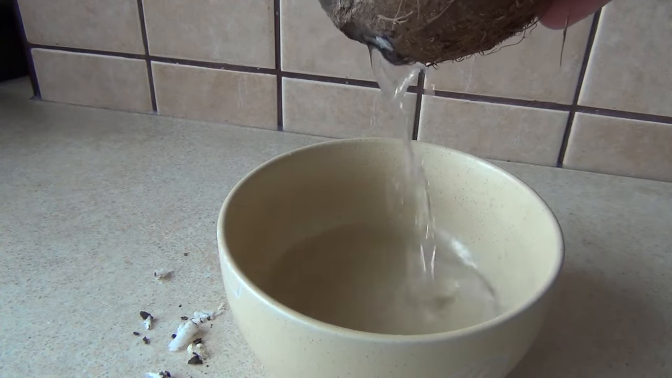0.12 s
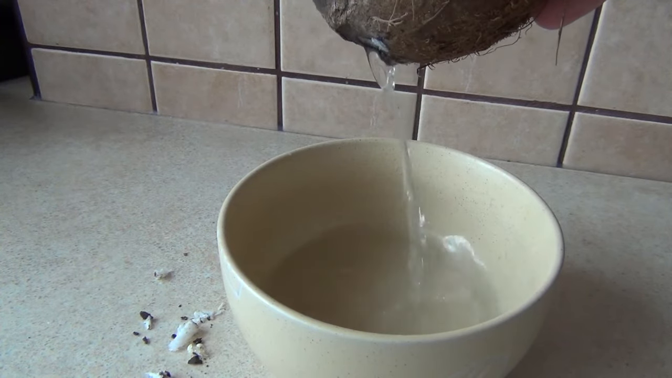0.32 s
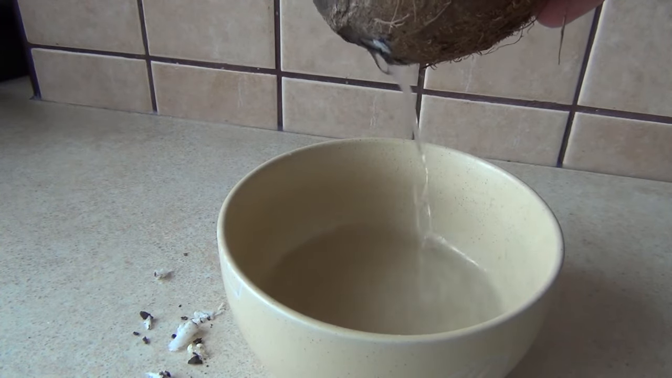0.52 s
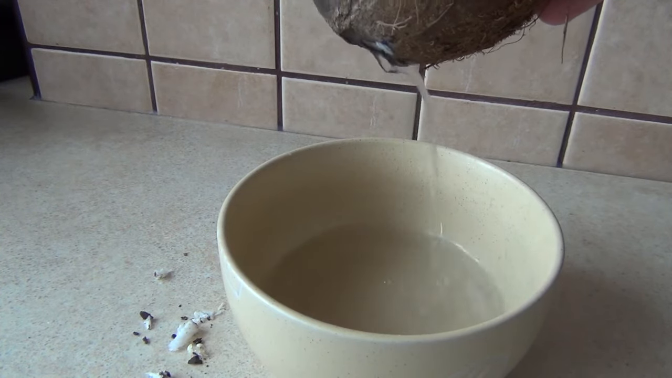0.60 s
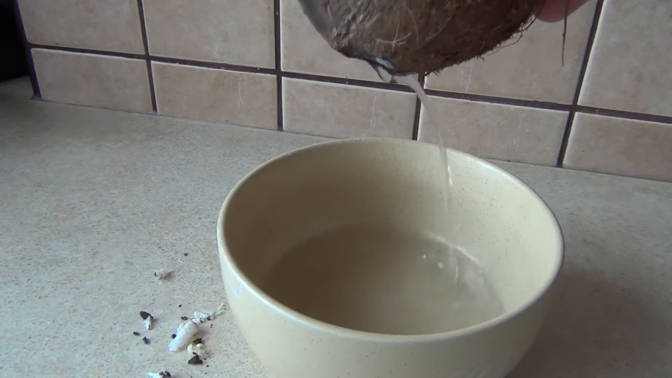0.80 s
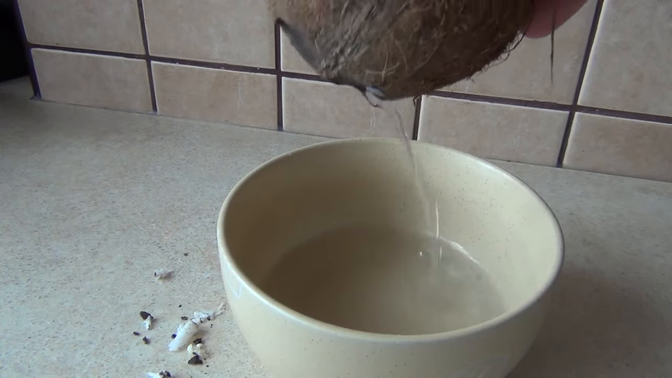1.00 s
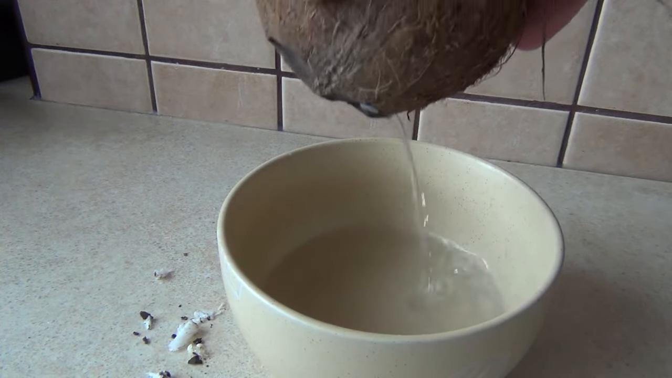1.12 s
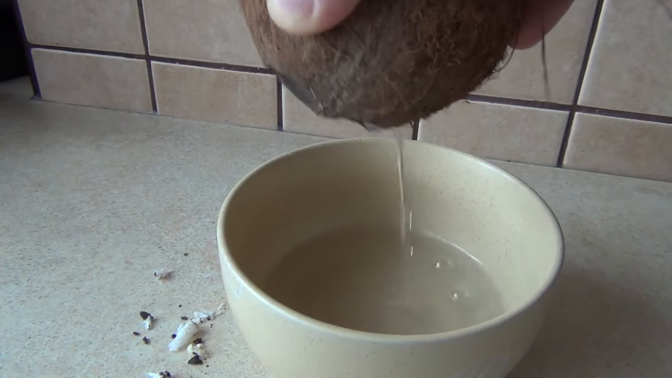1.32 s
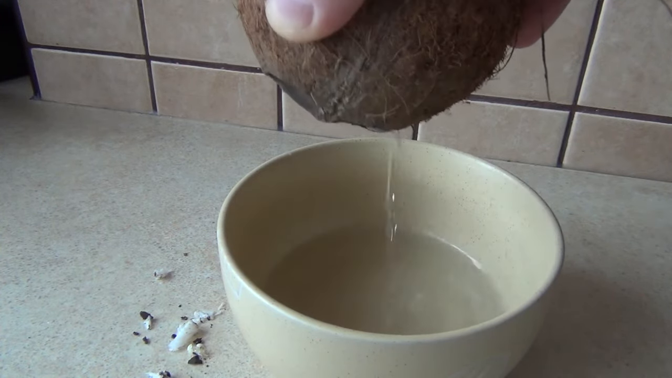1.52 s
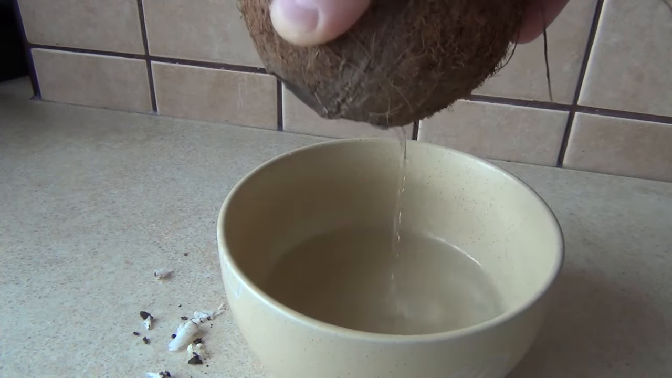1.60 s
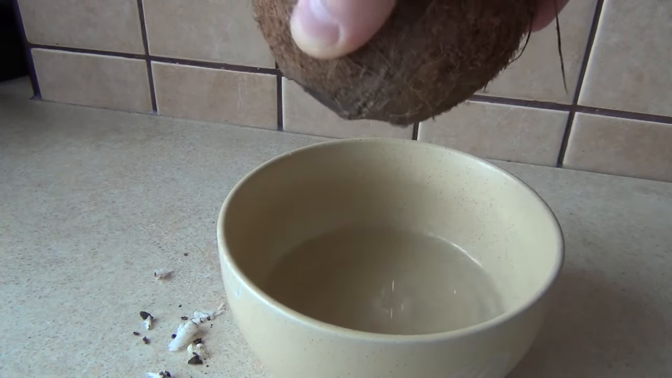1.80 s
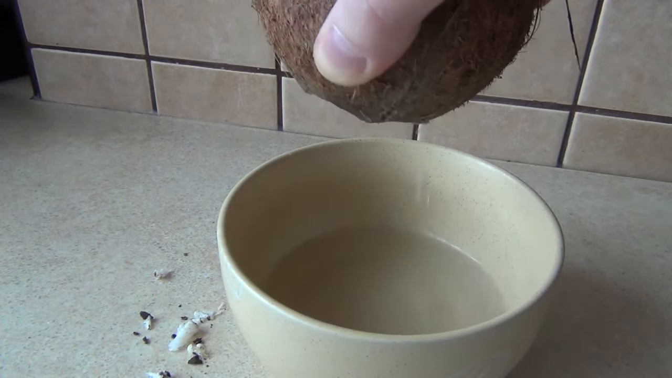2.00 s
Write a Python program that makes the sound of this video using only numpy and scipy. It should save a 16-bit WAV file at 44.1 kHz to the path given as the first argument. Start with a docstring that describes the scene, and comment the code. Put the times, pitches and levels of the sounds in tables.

```python
"""A kitchen counter, the camera's microphone close to a ceramic bowl. Appliances hum from the start.
A broken stream of water falls into the bowl: drops tick on the surface in a fine spray, then trap
bubbles that sing, most of them rising in pitch. The bowl rings along and the tiles echo.
After a second and a half the water thins to a few last drops, leaving the hum."""
import sys
import numpy as np
from scipy import signal
from scipy.fft import rfft, irfft, next_fast_len
from scipy.io import wavfile
from scipy.ndimage import uniform_filter1d

SR = 44100
rng = np.random.default_rng(int(sys.argv[2]) if len(sys.argv) > 2 else 0)


def master(y):
    """Save y as 16-bit WAV."""
    cut = np.clip(np.atleast_2d(y).T, -1, 1)
    pcm = np.round(cut * 32767)  # scale
    wavfile.write(sys.argv[1], SR, pcm.astype(np.int16))


N = 88200

# spectrum of appliance and camera noise (frequency [Hz], relative density [dB])
HUM_SPECTRUM = [(18, -66), (30, -20), (50, -10.5), (91, -14), (171, 0), (190, -7), (519, -13.5), (659, -5),
                (1060, -0.5), (1450, -22.5), (2740, -19), (4410, -19.5), (5160, -18.5), (9730, -28),
                (15200, -22.5), (16500, -78)]
# stereo width of that noise (frequency [Hz], side minus mid [dB])
HUM_WIDTH = [(60, -5), (110, -5), (200, -21), (380, -5.5), (700, -13), (1290, -21), (2380, -10.5),
             (4400, -30), (8120, -2), (15000, -45)]
# mains tones (frequency [Hz], level [dB], right minus left [dB])
MAINS_TONES = [(99.5, -75.5, 13.5), (199.3, -68.5, 10)]
# strength of the fine spray (time [s], level [dB])
SPRAY_LEVELS = [(.1, -70.5), (.3, -55.5), (0.398, -54), (.7, -46.5), (0.849, -57), (1.001, -41),
                (1.05, -53.5), (1.5, -57.5), (1.56, -64)]
# drops meeting the surface (time [s], level [dB], pitch [Hz], decay to 1/e [cycles])
DROP_TICKS = [(0.0307, -43, 10600, 5), (0.137, -31, 8740, 2.2), (0.1555, -18, 12240, 4.9),
              (0.1698, -30.5, 10230, 10.4), (0.202, -40, 8250, 4.1), (0.2211, -23, 10040, 4.7),
              (0.2599, -19, 11300, 11.3), (0.279, -25, 9400, 5.9), (0.293, -17, 10850, 2.5),
              (0.3235, -27, 13400, 3.5), (0.33, -12, 8900, 2.7), (0.3386, -8, 10600, 4.5),
              (0.3692, -4, 10180, 2.1), (0.3934, -34, 9150, 4.5), (0.4197, -23, 8960, 3.7),
              (0.4453, -11.5, 9250, 2.3), (0.4533, -15, 10460, 2), (0.457, -13, 10600, 4.3),
              (0.473, -2.5, 9080, 1.46), (0.4861, -21.5, 11100, 12), (0.5272, -16, 10500, 4),
              (0.5312, -21, 10400, 12), (0.546, -27, 10000, 2.8), (0.569, -24, 9200, 4.6),
              (0.5778, -16, 8570, 3.5), (0.5955, -23, 11000, 4.1), (0.6068, -10, 10260, 3.8),
              (0.631, -13, 7460, 1.1), (0.6476, -8.5, 10340, 1.4), (0.673, -29, 10000, 3.5),
              (0.6777, -12, 11400, 2.5), (0.7115, -14, 7700, 1.1), (0.7218, -20, 10400, 1.9),
              (0.7438, -4, 9330, 3.3), (0.756, -25, 9800, 3.8), (0.772, -19, 8450, 3),
              (0.8071, -8, 9230, 3.4), (0.8143, -24, 10300, 3.7), (0.8267, -12.5, 9550, 6.3),
              (0.874, -33, 11000, 4.6), (0.9173, -22.5, 8900, 3.6), (0.9254, -18.5, 10160, 4.4),
              (0.9324, -26, 9100, 3.8), (0.9669, -9, 9000, 3.8), (0.979, -30, 10000, 3.5),
              (0.9833, -24, 8900, 4.6), (0.9968, -11, 9610, 2.6), (1.011, -30, 10400, 3.1),
              (1.0657, -18.5, 9900, 2.2), (1.074, -28, 9400, 4.6), (1.087, -21.5, 11700, 4.7),
              (1.145, -33, 11500, 6.8), (1.1768, -0.5, 8550, 2), (1.22, -11, 14540, 2.2),
              (1.2353, -4, 11030, 3.3), (1.242, -15.5, 10000, 3.6), (1.2795, -23.5, 11100, 3.2),
              (1.3163, -4, 9400, 2.8), (1.4138, -23, 10200, 4.5), (1.462, -18, 8820, 6.9),
              (1.474, -16.5, 11430, 5.9), (1.509, -17.5, 11650, 2.6), (1.5152, -18, 11100, 2.2),
              (1.681, -25, 11100, 4.2), (1.7242, -25.5, 10230, 12.3), (1.7635, -25, 9000, 4.9)]
# small trapped bubbles (time [s], level [dB], first pitch [Hz], t60 [s])
SMALL_BUBBLES = [(0.1365, -26.5, 4160, 0.017), (0.203, -35, 5080, 0.0084), (0.2972, -21, 3870, 0.015),
                 (0.3385, -32.5, 4720, 0.031), (0.3559, -30.5, 3740, 0.021), (0.3708, -16.5, 5940, 0.009),
                 (0.377, -22, 3690, 0.015), (0.3844, -30, 5180, 0.014), (0.4176, -25, 5160, 0.011),
                 (0.4213, -27.5, 3750, 0.012), (0.446, -20.5, 4700, 0.015), (0.4526, -27, 3586, 0.017),
                 (0.4739, -20.5, 4760, 0.011), (0.5457, -31, 3770, 0.017), (0.5688, -31.5, 2850, 0.048),
                 (0.5814, -23, 3510, 0.0091), (0.605, -28.5, 3040, 0.029), (0.632, -27, 6150, 0.011),
                 (0.647, -35.5, 3640, 0.034), (0.6792, -27, 3300, 0.013), (0.7122, -22, 4030, 0.0088),
                 (0.7493, -37, 3080, 0.068), (0.7693, -34, 4940, 0.017), (0.8075, -28, 6150, 0.023),
                 (0.824, -10.5, 5646, 0.014), (0.918, -33, 3180, 0.024), (0.9325, -25, 2880, 0.016),
                 (0.966, -9, 5850, 0.0089), (1.0642, -38, 4400, 0.02), (1.1765, -29, 4400, 0.02),
                 (1.2338, -17, 5640, 0.011), (1.2423, -26.5, 4420, 0.02), (1.3156, -29.5, 3890, 0.034),
                 (1.318, -31, 4400, .02), (1.397, -35, 3540, 0.026), (1.5075, -40, 3740, 0.058),
                 (1.5226, -36, 5100, 0.022), (1.6591, -46, 6050, 0.019)]
# large trapped bubbles (time [s], level [dB], first pitch [Hz], last pitch [Hz], length [s], t60 [s],
# bend [exponent: under 1 glides early, over 1 late])
LARGE_BUBBLES = [(0.2222, -19, 2018, 2100, 0.0064, 0.21, 0.19), (0.282, -35, 2820, 2960, 0.015, 0.04, 1.3),
                 (0.294, -24, 1470, 1890, 0.0084, 0.04, 0.27), (0.339, -32, 1942, 2050, 0.012, 0.059, 1.4),
                 (0.35, -26.5, 1210, 1427, 0.025, 0.04, 0.17), (.37, -21, 1990, 2420, 0.0048, 0.029, 1),
                 (0.412, -28.5, 1993, 2200, 0.0091, 0.046, 1), (0.444, -31, 1500, 1680, 0.021, 0.07, 0.92),
                 (0.475, -23.5, 1290, 1970, 0.014, 0.068, 0.44), (.545, -12, 937, 1045, 0.0065, 0.023, 1.3),
                 (.5555, -23, 1180, 1340, 0.013, 0.15, 0.83), (.569, -16, 896, 1443, 0.022, 0.18, 0.68),
                 (0.595, -23, 1346, 1560, 0.015, 0.05, 0.96), (0.65, -33.5, 1550, 1540, 0.021, 0.073, 1.2),
                 (.678, -42, 1110, 1960, 0.081, 0.25, 0.97), (0.72, -22.5, 1260, 2156, 0.018, 0.07, 1.13),
                 (.744, -29, 2085, 2250, 0.0072, 0.045, 1.1), (0.758, -33.5, 1321, 1378, 0.012, 0.07, 1.2),
                 (0.81, -29.5, 2070, 2080, 0.017, 0.057, 1.4), (0.816, -27, 1910, 2200, 0.006, 0.03, 1.14),
                 (.85, -30, 960, 920, 0.02, 0.04, 0.79), (0.875, -23.5, 909, 928, .013, 0.5, 2.8),
                 (.887, -30, 1140, 2065, 0.021, 0.09, 0.72), (0.915, -31, 2060, 2250, 0.0043, .05, 1.3),
                 (0.9313, -17, 1570, 2090, 0.015, 0.035, 0.42),
                 (.967, -20.5, 2840, 3790, 0.02, 0.042, 0.74), (0.984, -19, 2090, 2160, 0.0074, 0.067, 1.1),
                 (1.002, -16, 1788, 1880, 0.096, 0.048, 1.5), (1.0511, -13, 891, 913, 0.016, 0.15, 2.6),
                 (1.068, -37, 1190, 2100, 0.015, 0.081, 0.92), (1.087, -21.5, 930, 1002, 0.011, 0.13, 1.4),
                 (1.102, -38, 1100, 2450, 0.036, 0.6, 1.34), (1.145, -24.5, 905, 2040, 0.034, .12, 7.8),
                 (1.19, -31.5, 792, 990, 0.023, 0.61, 6), (1.236, -35, 1300, 2400, .034, 1.5, 1.2),
                 (1.233, -19.5, 2158, 1920, 0.018, 0.039, 0.67), (1.3673, -27, 980, 1000, 0.074, .05, 0.83),
                 (1.422, -43, 1315, 2310, 0.026, 0.18, 1.5), (1.45, -38, 3460, 5250, 0.0056, 0.089, 0.98),
                 (1.5075, -17.5, 1962, 2242, 0.0056, 0.039, 0.87),
                 (1.5173, -23, 1930, 2220, 0.0091, 0.017, 0.64)]
# resonances of the bowl and the air in it (frequency [Hz], peak re direct sound [dB], t60 [s])
BOWL_MODES = [(912, 11, .026), (2010, 1, .03), (2110, -3, .04), (4475, 6, .11), (5670, 1, .07),
              (1360, -3, .2), (1760, -3, .08), (3700, -3, .03), (6000, 0, .06), (6500, -2, .04),
              (9700, -4, .02), (10350, 0, .025)]
SIDE = np.array([[1], [-1]])  # a side signal adds on the left and subtracts on the right

HUM_DB = -54.5
SPRAY_PER_S, SPRAY_SPREAD_DB, SPRAY_GLIDE = 1500, 11, .015
TICK_RISE_S, TICK_LOW_HZ = .00008, 3600
SPLASH_DB, SPLASH_T60_S, SPLASH_SPAN, SPLASH_TOP_HZ = -16, .026, (.72, 1.12), 11500
WOBBLE = .018  # spread of a bubble's pitch, as a fraction of it
SMALL_OCT_PER_S, SPLAT_DB, SPLAT_WIDTH_HZ = 5.5, -7, 990
RISE_S, BURST_S, THIN_DB_PER_OCT = .00027, .0006, -3
TREMBLE_DB, BREAKUP_DB_PER_OCT = 2.5, 6
THUD_DB, THUD_S = -22, .0004
SLAP_DB, SLAP_T60_S, SLAP_HZ = -12.5, .029, 4000
ROOM_DB, ROOM_T60_S, ROOM_TOP_HZ, ROOM_WIDTH = -16, .22, 9250, .3
PORTS_DB, PORTS_HZ, PORTS_LAG_SAMPLES = -17, (4800, 10200), 9
BASS_CUT_HZ, TOP_HZ = 92, 16100


def undb(db):
    return 10 ** (np.asarray(db) / 20)


def add(out, at_s, x):
    i = int(at_s * SR)
    out[i:i + len(x)] += x[:len(out) - i]


def fade(t, t60):
    return np.exp(-np.log(1000) * t / t60)


def filtered(x, order, hz, kind="low"):
    return signal.lfilter(*signal.butter(order, hz, kind, fs=SR), x)


def walk(rate_hz):
    """A smooth random drift with a spread of 1."""
    hold = int(SR / rate_hz)
    steps = np.repeat(rng.standard_normal(N // hold + 1), hold)
    drift = uniform_filter1d(uniform_filter1d(steps, hold), hold)[:N]
    return drift / drift.std()


def spectrum_gain(table):
    """Gain at each FFT bin, interpolated in dB over log frequency."""
    hz, db = np.array(table).T
    return undb(np.interp(np.log(np.fft.rfftfreq(N, 1 / SR) + 1), np.log(hz), db))


def kitchen_hum():
    """Room tone: steady appliance and camera noise with two mains tones."""
    mid, side = rfft(rng.standard_normal((2, N))) * spectrum_gain(HUM_SPECTRUM)
    mid, side = irfft(mid, N), irfft(side * spectrum_gain(HUM_WIDTH), N)
    out = (mid + side * SIDE) * undb(HUM_DB) / mid.std()
    for hz, db, pan_db in MAINS_TONES:
        tone = np.sqrt(2) * np.sin(2 * np.pi * (hz * np.arange(N) / SR + rng.random()))
        out += undb(db - SIDE * pan_db / 2) * tone
    return out


def fine_spray():
    """Tiny drops land at random, each a faint rising ping; together they fizz."""
    out, t = np.zeros(N), np.arange(600) / SR
    draws = rng.random((3600, 4))
    times = np.cumsum(-np.log(1 - draws[:, 0])) / SPRAY_PER_S
    for at, (_, strength, pitch, length) in zip(times[times < N / SR], draws):
        hz = 1300 * 10.07 ** (pitch ** 1.408)
        cycles = .45 + 8.8 * length ** 2
        age = t * hz / cycles
        chirp = np.sin(2 * np.pi * hz * t * (1 + SPRAY_GLIDE * age))
        add(out, at, undb(SPRAY_SPREAD_DB * strength ** 2) * age * np.exp(-2 * age) * chirp)
    level_db = np.interp(np.arange(N) / SR, *np.array(SPRAY_LEVELS).T)
    return out / out.std() * undb(level_db)


def drop_ticks():
    """Each drop rings a tiny bubble for a few cycles and splashes droplets near that pitch."""
    out, t = np.zeros(N), np.arange(2600) / SR
    attack = (1 - np.exp(-t / TICK_RISE_S)) ** 2
    for at, db, hz, cycles in DROP_TICKS:
        band_hz = np.minimum(hz * np.array(SPLASH_SPAN), SPLASH_TOP_HZ)
        splash = filtered(rng.standard_normal(len(t)), 2, band_hz, "band") * fade(t, SPLASH_T60_S)
        ring = np.exp(-t * hz / cycles) * np.sin(2 * np.pi * hz * t)
        add(out, at, undb(db) * attack * (ring + undb(SPLASH_DB) * splash))
    return filtered(out, 2, TICK_LOW_HZ, "high")


def small_bubbles(wobble):
    """Small pockets of trapped air ping and climb, each trailing a noisy splat around its pitch."""
    out, t = np.zeros(N), np.arange(SR // 12) / SR
    noise = filtered(rng.standard_normal(N), 2, SPLAT_WIDTH_HZ)
    noise /= noise.std()
    attack = 1 - np.exp(-t / .00033)
    for at, db, first_hz, t60 in SMALL_BUBBLES:
        here = slice(int(at * SR), int(at * SR) + len(t))
        hz = np.minimum(first_hz * 2 ** (SMALL_OCT_PER_S * t), 16000) * wobble[here]
        splat = undb(SPLAT_DB) * fade(t, 2 * t60) * noise[here]
        envelope = attack * (fade(t, t60) + splat)
        add(out, at, undb(db) * envelope * np.sin(2 * np.pi * np.cumsum(hz) / SR))
    return out


def large_bubbles(wobble):
    """Each opens with a thud and a wet slap, rings unevenly and bursts; most climb as they surface."""
    out, tremble = np.zeros(N), walk(rate_hz=210)
    slap_noise = filtered(rng.standard_normal(N), 1, [SLAP_HZ / 3, SLAP_HZ], "band")
    for at, db, first_hz, last_hz, length, t60, bend in LARGE_BUBBLES:
        t = np.arange(int((length + 8 * BURST_S) * SR)) / SR
        here = slice(int(at * SR), int(at * SR) + len(t))
        glide = np.minimum(t / length, 1) ** bend
        hz = (first_hz + (last_hz - first_hz) * glide) * wobble[here]
        cutoff = np.exp(-np.maximum(t - length, 0) / BURST_S)
        envelope = (1 - np.exp(-t / RISE_S)) * fade(t, t60) * cutoff
        # the tone gets rougher and thinner as it climbs
        octaves = np.log2(hz / first_hz)
        rough_db = (TREMBLE_DB + BREAKUP_DB_PER_OCT * abs(octaves)) * tremble[here]
        envelope *= undb(rough_db + THIN_DB_PER_OCT * octaves)
        ring = envelope * np.sin(2 * np.pi * np.cumsum(hz) / SR)
        ring /= abs(bowl_gain(first_hz))  # the bowl leaves the level at the first pitch unchanged
        thud_age = t / THUD_S
        thud = undb(THUD_DB) * thud_age * np.exp(1 - thud_age) * (1 - thud_age / 2)
        slap = undb(SLAP_DB) * fade(t, SLAP_T60_S) * slap_noise[here]
        add(out, at, undb(db) * (ring + thud + slap))
    return out


def bowl_gain(hz):
    """The direct path to the microphone plus the resonances of the bowl, as a complex gain."""
    return 1 + sum(undb(db) / (1 + 2j * np.pi * (hz - mode_hz) * t60 / np.log(1000))
                   for mode_hz, db, t60 in BOWL_MODES)


def tile_echo(water):
    """The tiles return a short, narrow echo that starts 3 ms behind the direct sound."""
    t = np.arange(SR // 2) / SR
    noise = filtered(rng.standard_normal((2, len(t))), 1, ROOM_TOP_HZ)
    mid, side = noise * fade(t, ROOM_T60_S) * (t > .003)
    response = (mid + ROOM_WIDTH * side * SIDE) * undb(ROOM_DB) / np.linalg.norm(mid)
    return signal.fftconvolve(water[None], response, axes=1)[:, :N]


def microphone_ports(water):
    """The two microphone ports add a slightly late side signal in the treble."""
    return undb(PORTS_DB) * filtered(np.roll(water, PORTS_LAG_SAMPLES), 2, PORTS_HZ, "band") * SIDE


def scene():
    """Water in the bowl, close and centred, with the kitchen behind it."""
    wobble = 1 + WOBBLE * walk(rate_hz=260)
    water = large_bubbles(wobble) + small_bubbles(wobble) + drop_ticks() + fine_spray()
    padded = next_fast_len(2 * N)
    bowl = bowl_gain(np.fft.rfftfreq(padded, 1 / SR))
    water = irfft(rfft(water, padded) * bowl, padded)[:N]
    water = filtered(water, 2, BASS_CUT_HZ, "high")
    return water + microphone_ports(water) + tile_echo(water) + kitchen_hum()


def record(dry):
    """The camera cuts the top treble steeply."""
    return signal.sosfilt(signal.ellip(8, .2, 70, TOP_HZ, fs=SR, output="sos"), dry)


dry = scene()
out = record(dry)
master(out)
```